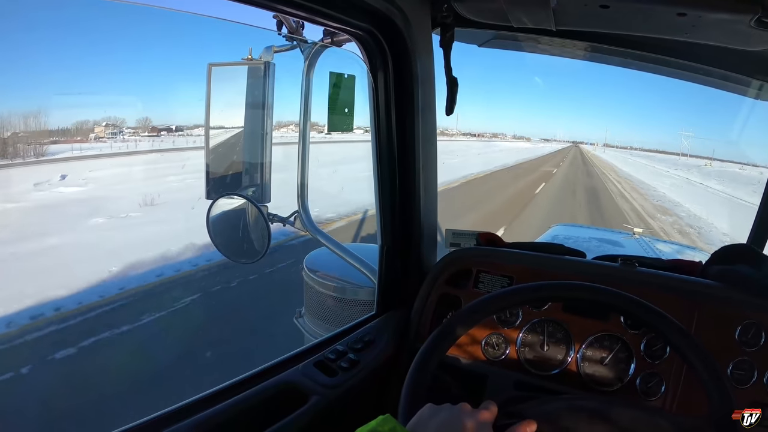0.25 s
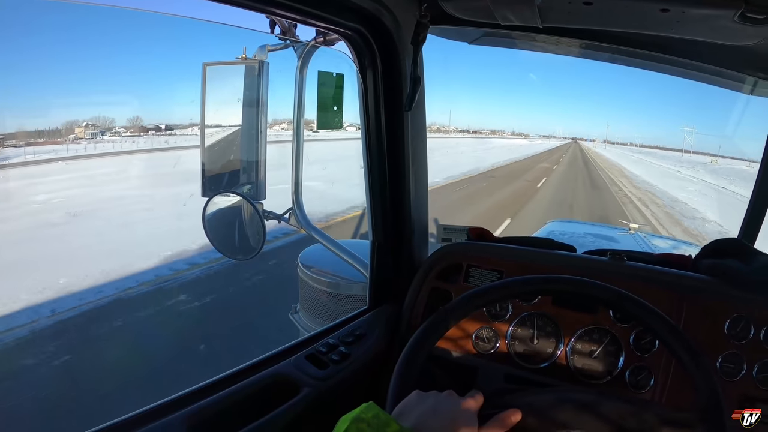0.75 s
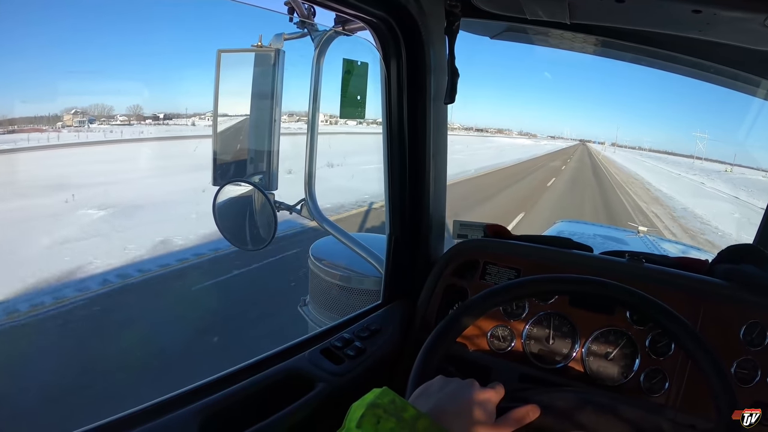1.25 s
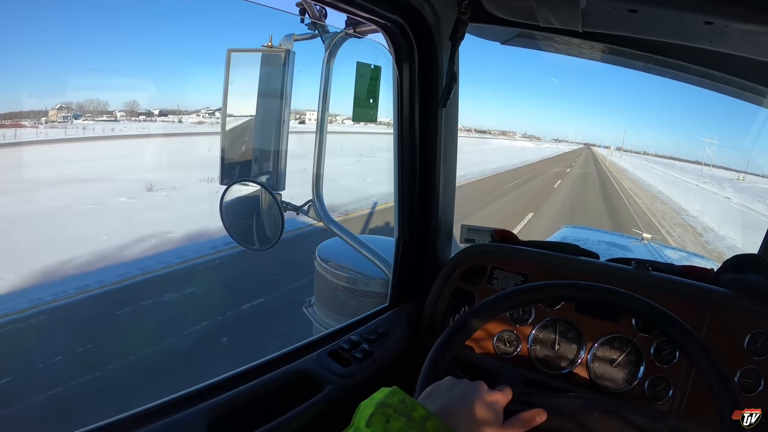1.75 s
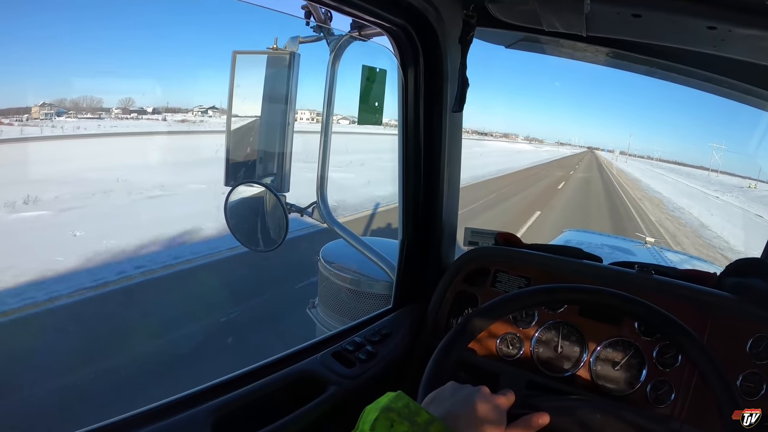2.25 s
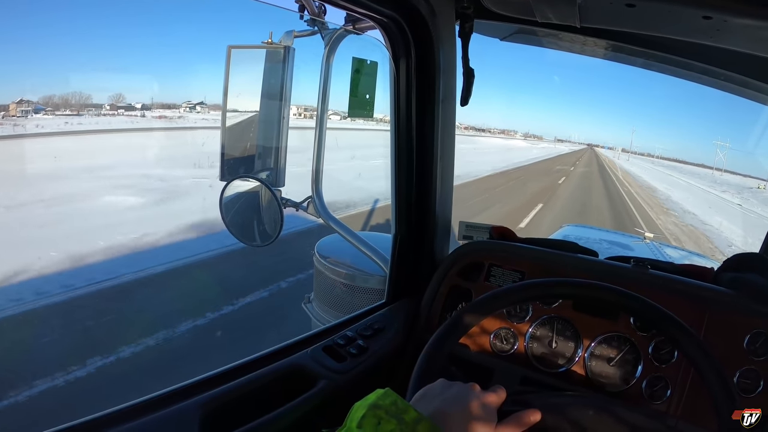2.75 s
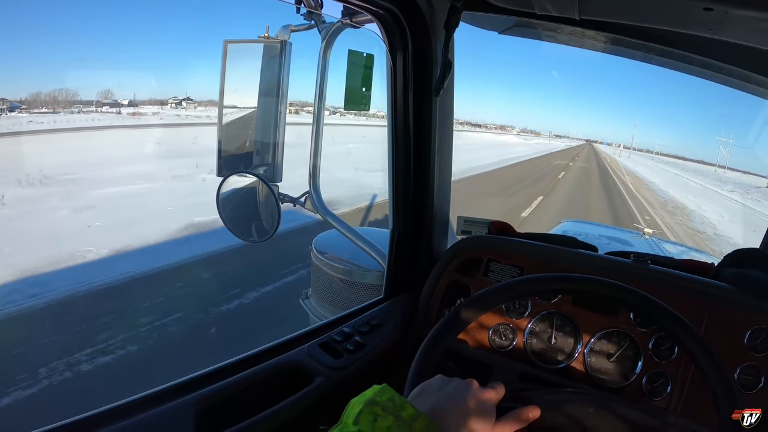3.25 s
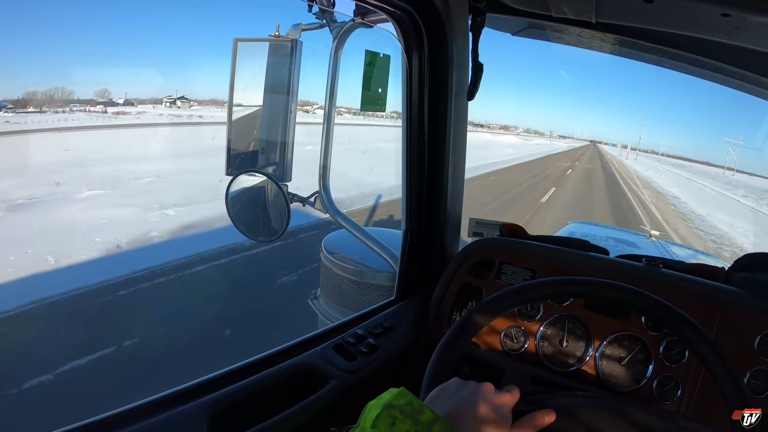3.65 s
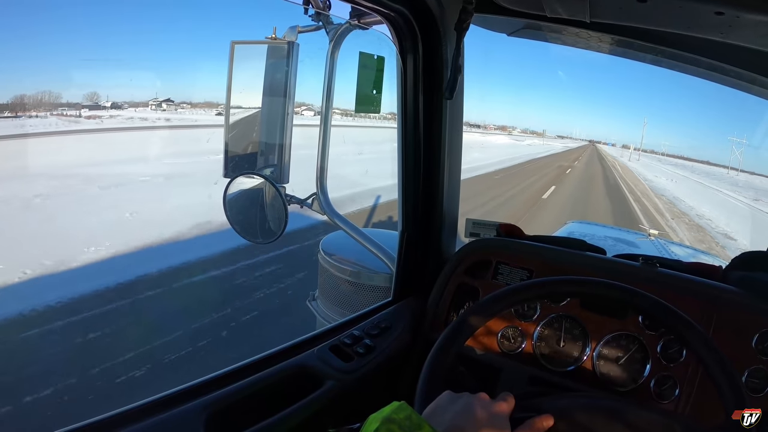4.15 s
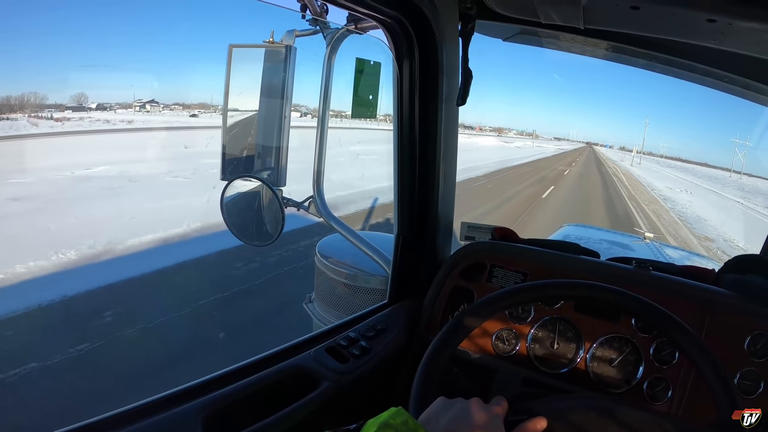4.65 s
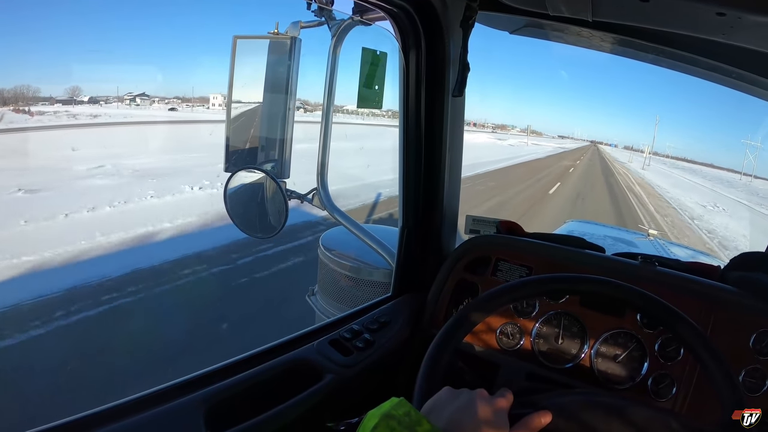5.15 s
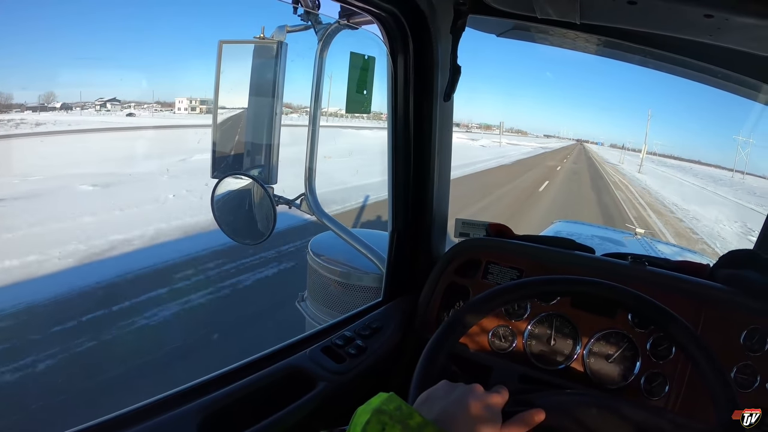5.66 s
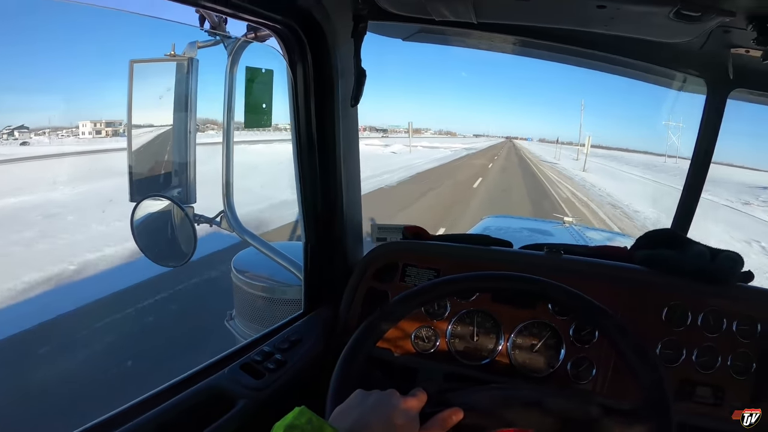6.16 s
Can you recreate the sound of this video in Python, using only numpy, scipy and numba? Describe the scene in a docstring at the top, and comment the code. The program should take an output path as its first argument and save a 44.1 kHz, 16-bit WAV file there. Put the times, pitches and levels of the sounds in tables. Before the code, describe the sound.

A diesel truck's deep, steady engine drone fills the cab over road rumble and tyre and wind hiss as it slowly gains speed.

```python
"""A deep, steady engine boom fills the cab of a loaded truck slowly gaining speed on a highway.
The six-cylinder diesel booms at twice its firing rate, over a stack of weaker, uneven engine and gear tones.
The road rumbles through the floor; tyres and wind hiss, louder on the left. The drivetrain whines,
a metal part rings, the turbo whistles faintly and one soft tick comes about a second in.
A limiter (an automatic volume control) holds down the bass peaks."""
import sys
import numpy as np
from scipy import signal
from scipy.fft import rfft, irfft, next_fast_len
from scipy.io import wavfile
from scipy.ndimage import uniform_filter1d, minimum_filter1d
from numba import njit

SR = 44100
rng = np.random.default_rng(int(sys.argv[2]) if len(sys.argv) > 2 else 0)


def waveform_to_disk(signal):
    """Save audio, clipped to [-1, 1], as 16-bit WAV at the path in sys.argv[1]."""
    frames = np.transpose(np.atleast_2d(signal))
    scaled = np.clip(frames, -1, 1) * 32767
    samples = np.round(scaled).astype(np.int16)
    wavfile.write(sys.argv[1], SR, samples)


N = 282681
TIME_S = np.arange(N) / SR
# an engine cycle is two crank turns and six firings; this is how many happen each second at the start
CYCLE_HZ = 11.007

# how sound reaches the two microphones: pitch_hz, likeness (0 to 1), left_over_right_db, left_lag_rad
STEREO = [(25, .985, .2, 0), (60, .995, .4, 0), (130, .996, .5, .02), (260, .96, .7, .08),
          (530, .91, 2.6, .1), (1100, .87, 3.4, .45), (2300, .68, 3.2, .85), (3900, .4, 1.6, .8),
          (5000, .22, 1, .3), (10000, .15, .5, .3)]


def engine(cycle_rad, boom_multiple=12, middle_s=3.2):
    """The firings and gears make tones that follow the engine speed, each wavering a little."""
    # engine and gear tones: multiple (of the cycle rate), level_db (at middle_s), change_db_per_s
    tones = [(2, -35, 0), (3, -38, .5), (4, -36, -.4), (5, -40, 0), (6, -43, -1), (7, -34.5, 0),
             (8, -28.5, .3), (9, -32, .6), (10, -30, 1.2), (11, -33.5, .9), (13, -43, -.8),
             (14, -29.5, -.6), (15, -43, 0), (16, -27.5, .7), (18, -34, -1.3), (20, -46, -.4),
             (21, -46.5, 0), (22, -40, -.3), (23, -46.5, -.6), (24, -37.5, -.6), (28, -48.5, -2),
             (29, -51.5, -.3), (30, -50.5, -1.5), (31, -52, 0), (32, -50.5, -.3), (34, -54, .3),
             (39, -50.5, .3), (42, -52, .8), (47, -51.5, .5), (54, -57, -1.5), (72.42, -50.5, .8),
             (82, -56, 0), (94, -59, 2), (104, -52, -1.9)]
    boom = (boom_multiple, -14.5, -.27)
    out = 0
    for multiple, level_db, change_db_per_s in [boom] + tones:
        if multiple == boom_multiple:  # the cab resonates here, so the boom is steady and fills it evenly
            waver_db, offset_rad, skew_rad = .3, 0, .03
        else:
            waver_db = 1
            offset_rad = -.42 + .367 * (multiple - boom_multiple) ** 2  # the same firings tie all tones
            skew_rad = min(.0065 * multiple, .16)  # shorter waves reach the two sides more out of step
        db = level_db + change_db_per_s * (TIME_S - middle_s) + waver_db * drift(3)
        phase = multiple * cycle_rad + offset_rad + .15 * drift(2)
        sides = np.array([[1], [-1]])
        pan = from_db(sides * at_pitch(multiple * CYCLE_HZ, STEREO, column=2) / 2)
        skew = sides * skew_rad * rng.choice([-1, 1])
        out = out + np.sqrt(2) * from_db(db) * pan * np.sin(phase + skew)
    return out


def road_rumble(follow=.75, deep_hz=55):
    """The road shakes the frame and floor; only the deepest part swells over rough stretches."""
    # strength of the rumble from low to high: pitch_hz, level_db (per hertz)
    spectrum = [(8, -66.5), (14, -47), (20, -40), (35, -37), (55, -43.5), (80, -43), (110, -43), (135, -43),
                (170, -50), (245, -53), (285, -59), (320, -57.5), (370, -66.5), (500, -75), (900, -100),
                (20000, -170)]
    # roughness of the road, which the deep rumble partly follows: time_s, level_db
    roughness = [(0, -25), (1.6, -27), (2.15, -20), (2.5, -26), (2.86, -22), (3.15, -28), (3.6, -24),
                 (4.4, -26), (5.9, -22), (6.41, -24)]
    shake = stereo_noise(lambda hz: at_pitch(hz, spectrum, column=1))
    deep = signal.sosfiltfilt(signal.butter(2, deep_hz, fs=SR, output="sos"), shake)
    road_db = over_time(roughness, column=1)
    swell = from_db(follow * (road_db - road_db.mean()))
    return shake + (swell - 1) * deep


def tyre_and_wind_hiss(cycle_rad, swell_db=2.5, swell_s=3.9):
    """Tyres and wind hiss louder as speed rises; the hiss pulses faintly in time with the engine."""
    # strength of the hiss from low to high: pitch_hz, level_db (per hertz)
    spectrum = [(150, -80.5), (400, -64.5), (600, -64), (770, -68), (1100, -66.5), (1750, -75.5),
                (2100, -76), (3100, -78), (3550, -78), (4100, -83.5), (5000, -88), (6400, -92),
                (9500, -100.5), (9950, -107), (10800, -112), (12200, -111), (15000, -124)]
    # narrow bands that the cab boosts or swallows: pitch_hz, width_hz, boost_db
    resonances = [(437, 30, 2), (519, 44, 3), (685, 50, 3.5), (927, 40, 4), (1314, 40, 1.5), (1770, 60, -3),
                  (1950, 200, 2.5), (2085, 40, -3), (2135, 50, 5), (2200, 45, -3), (2510, 45, 3.5),
                  (2900, 30, 4), (3060, 200, -2.5), (3500, 120, 2.5), (3620, 30, 3.5), (3770, 30, 4),
                  (4300, 200, 2), (4725, 45, 5), (6300, 340, 3.5), (7800, 570, 4)]

    def level_at(hz):
        cab_db = sum(db / (1 + (2 * (hz - mid_hz) / width_hz) ** 2) for mid_hz, width_hz, db in resonances)
        return at_pitch(hz, spectrum, column=1) + cab_db

    # pulses with the engine cycle, a throb four times a cycle, and the boom
    pulse = 1 + .025 * np.cos(cycle_rad) + .035 * np.cos(4 * cycle_rad) + .025 * np.cos(12 * cycle_rad)
    rise_db = swell_db * (1 - np.exp(-TIME_S / swell_s))
    flicker_db = .5 * drift(3)
    return pulse * from_db(rise_db + flicker_db) * stereo_noise(level_at)


def drivetrain_whine(hoarse_per_s=60, left_over_right_db=3):
    """The drivetrain sings one wandering note, made hoarse by fast random changes."""
    # path of the note: time_s, pitch_hz, level_db
    path = [(0, 686.3, -50.5), (1.9, 692, -46.5), (2.3, 692, -54.5), (2.9, 701, -50), (3.3, 672.3, -48),
            (3.75, 668, -44), (4.2, 679, -49.5), (4.6, 687, -47.5), (5.35, 691.4, -42.5), (5.8, 676, -48),
            (6.41, 672, -51)]
    hoarse = drift(hoarse_per_s) + 1j * drift(hoarse_per_s)  # random strength and phase
    phase = 2 * np.pi * np.cumsum(over_time(path, column=1)) / SR
    tone = np.real(hoarse * np.exp(1j * phase))
    pan_db = np.array([[1], [-1]]) * left_over_right_db / 2
    return tone / tone.std() * from_db(over_time(path, column=2) + pan_db)


def metal_ring(pitch_hz=3550, width_hz=24, flare_db=6, flares_per_s=9):
    """A small metal part, shaken in fits, rings on one thin note that slowly fades."""
    level_db = -63 - 1.5 * TIME_S + flare_db * drift(flares_per_s)
    shake = from_db(level_db) * rng.standard_normal(N)
    note = signal.lfilter(*signal.iirpeak(pitch_hz, pitch_hz / width_hz, fs=SR), shake)
    make_up = np.sqrt(SR / (np.pi * width_hz))  # restores the strength lost in the narrow filter
    return np.array([note, np.roll(note, -1)]) * make_up


def faint_tick(band_hz=(1100, 2900), rise_s=.005):
    """One soft, brief tick of noise rises and quickly dies away, about a second in."""
    # the tick: start_s, level_db (its peak is about 9 dB lower)
    ticks = [(.970, -29)]
    burst = 0
    for start_s, level_db in ticks:
        age = np.maximum(TIME_S - start_s, 0) / rise_s
        burst = burst + from_db(level_db) * age * np.exp(-age)
    noise = signal.sosfilt(signal.butter(4, band_hz, "bandpass", fs=SR, output="sos"), rng.standard_normal(N))
    return burst * noise / noise.std()


def turbo_whistle(start_hz=9490, climb_hz_per_s=52, flutter_hz=75, start_db=-82, rise_db_per_s=1):
    """The turbo's thin whistle climbs with the load; its pitch and strength flutter."""
    pitch_hz = start_hz + climb_hz_per_s * TIME_S + flutter_hz * drift(120)
    phase = 2 * np.pi * np.cumsum(pitch_hz) / SR
    level_db = start_db + rise_db_per_s * TIME_S + 2.7 * drift(25)
    return np.sqrt(2) * from_db(level_db) * np.sin(phase + np.array([[0], [.6]]))


def from_db(db):
    """Turn decibels into a number to multiply a sound by."""
    return 10 ** (np.asarray(db) / 20)


def over_time(table, column):
    """Join the rows of a time table with straight lines, giving a value for every sample."""
    return np.interp(TIME_S, [row[0] for row in table], [row[column] for row in table])


def at_pitch(hz, table, column):
    """Read between the rows of a pitch table, with octaves evenly spaced."""
    return np.interp(np.log(hz), np.log([row[0] for row in table]), [row[column] for row in table])


def drift(steps_per_s):
    """A smooth random wobble around zero: random steps, smoothed twice."""
    hold = int(SR / steps_per_s)
    steps = np.repeat(rng.standard_normal(N // hold + 1), hold)
    return uniform_filter1d(uniform_filter1d(steps, hold), hold)[:N]


def stereo_noise(level_at):
    """Noise shaped by level_at(hz), in dB per hertz; the two sides are most alike in the bass."""
    size = next_fast_len(N)
    hz = np.maximum(np.arange(size // 2 + 1) * SR / size, 1)
    likeness = np.clip(at_pitch(hz, STEREO, column=1), 0, 1)
    shared, left_only, right_only = (rfft(rng.standard_normal(size)) for _ in range(3))
    pan = from_db(at_pitch(hz, STEREO, column=2) / 2)
    lag = np.exp(-.5j * at_pitch(hz, STEREO, column=3))
    left = (np.sqrt(likeness) * shared * lag + np.sqrt(1 - likeness) * left_only) * pan
    right = (np.sqrt(likeness) * shared / lag + np.sqrt(1 - likeness) * right_only) / pan
    return irfft(np.array([left, right]) * from_db(level_at(hz)) * np.sqrt(SR / 2), size)[:, :N]


@njit
def recover(allowed, step):
    """The volume drops at once to what is allowed and climbs back gradually."""
    gain, out = 1., np.empty(len(allowed))
    for i in range(len(allowed)):
        gain = min(allowed[i], gain + (1 - gain) * step)
        out[i] = gain
    return out


def scene():
    """Add up all the sounds in the cab while the engine speeds up, ever more gently."""
    cycle_hz = CYCLE_HZ + .0698 * TIME_S - .00216 * TIME_S ** 2
    cycle_rad = 2 * np.pi * np.cumsum(cycle_hz) / SR
    return (engine(cycle_rad) + road_rumble() + tyre_and_wind_hiss(cycle_rad)
            + turbo_whistle() + metal_ring() + drivetrain_whine() + faint_tick())


def record(dry, bass_hz=300, limit_db=-7.2, look_ahead_s=.005, release_s=.05, top_hz=15000):
    """A limiter turns down only the bass, just ahead of its peaks; then the highest treble is cut."""
    bass = signal.sosfiltfilt(signal.butter(2, bass_hz, fs=SR, output="sos"), dry)
    window = int(look_ahead_s * SR)
    allowed = np.minimum(1, from_db(limit_db) / (np.abs(bass).max(axis=0) + 1e-9))
    gain = recover(minimum_filter1d(allowed, window), 1 / (release_s * SR))
    limited = dry - bass + uniform_filter1d(gain, window) * bass
    fade_in = np.minimum(1, TIME_S / .004)
    return signal.sosfilt(signal.ellip(8, .2, 70, top_hz, fs=SR, output="sos"), limited * fade_in)


dry = scene()
out = record(dry)
waveform_to_disk(out)
```